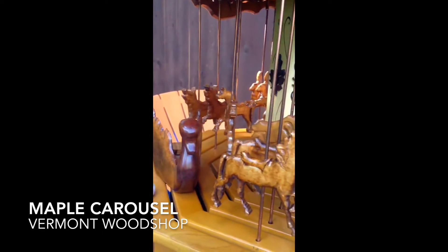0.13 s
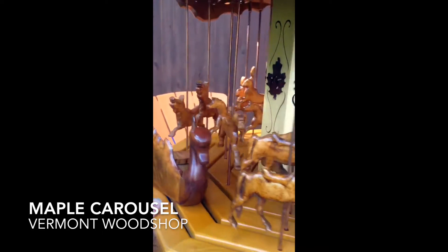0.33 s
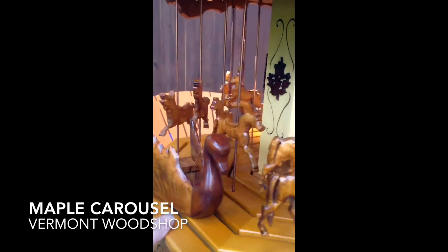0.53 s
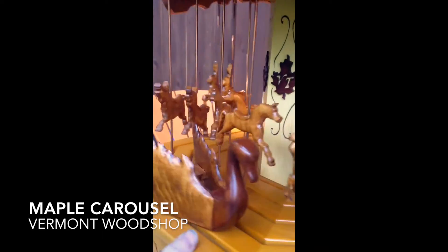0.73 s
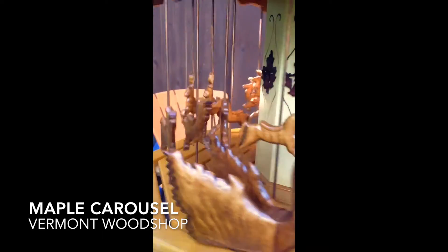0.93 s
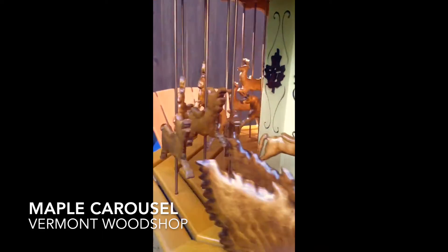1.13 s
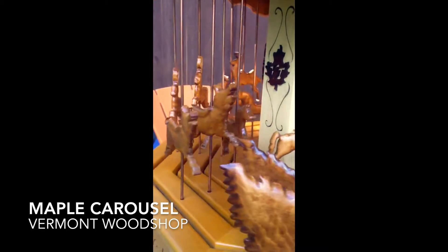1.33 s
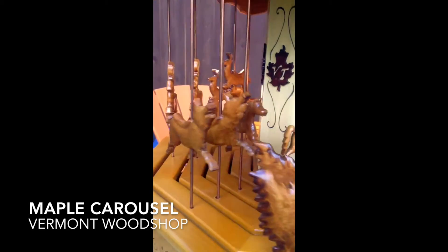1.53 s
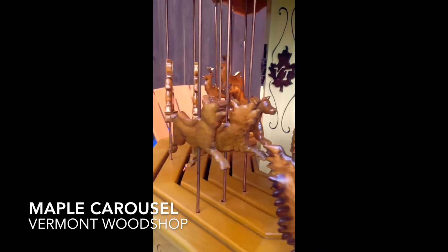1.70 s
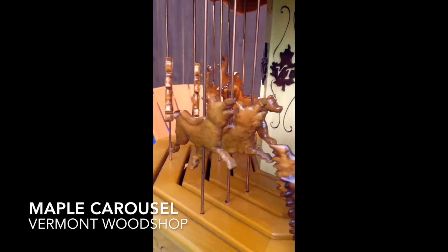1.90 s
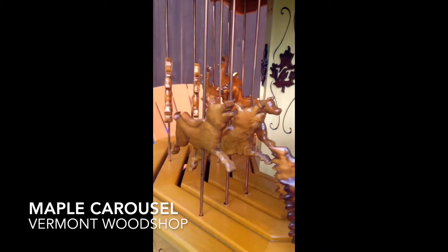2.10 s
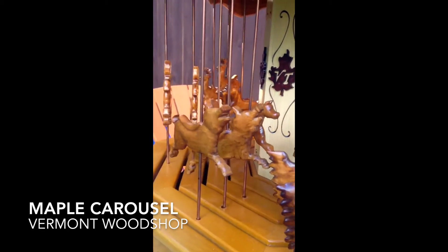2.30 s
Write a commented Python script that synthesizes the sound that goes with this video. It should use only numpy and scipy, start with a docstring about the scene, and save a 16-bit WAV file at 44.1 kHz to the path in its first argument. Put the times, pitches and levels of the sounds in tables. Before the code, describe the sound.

Wood rubbing on wood with hollow rumble and loose knocks as a small carousel is turned twice

```python
"""A wooden model carousel is pushed round twice by hand and coasts to rest, close to a phone in a quiet room.
Wood rubs on wood as noise and struck rings, cut into short slips; the hollow base rumbles as shaken resonances.
Loose figures knock with decaying modes, strong slips scuff as bright noise puffs, a few short high chirps sound
as like puffs, and the bearing squeaks faintly in narrow tones. A short noise tail adds the room's echo over a
steady shaped noise floor."""
import sys
import numpy as np
from scipy import signal
from scipy.io import wavfile
from scipy.ndimage import uniform_filter1d

SR = 44100
rng = np.random.default_rng(int(sys.argv[2]) if len(sys.argv) > 2 else 0)


def attenuation_scalar(level_db):
    """Turn a level in dB into a linear amplitude multiplier (20 dB per decade)."""
    decades = np.asarray(level_db, float) / 20
    return 10 ** decades


def put_to_file(sound):
    """Save the sound as 16-bit audio at rate SR, in the file named by the first command-line argument."""
    columns = np.atleast_2d(sound).T  # one column per channel
    safe = np.clip(columns, -1, 1)
    whole_steps = np.round(safe * 32767)
    wavfile.write(sys.argv[1], SR, whole_steps.astype(np.int16))


N = 103635  # length [samples]


def evened(x):
    """Scales a sound to an RMS of 1."""
    return x / np.sqrt(np.mean(x ** 2) + 1e-20)


def add(mix, s, sound):
    """Lays a sound into the mix at s seconds, cut off at the end."""
    part = mix[round(s * SR):][:len(sound)]
    part += sound[:len(part)]


def resonate(x, hz, width):
    """One resonance of gain 1, fixed or moving: shifts hz down to zero, smooths and shifts back."""
    turn = np.exp(2j * np.pi * np.cumsum(hz * np.ones(len(x))) / SR)
    r = np.exp(-np.pi * width / SR)
    return 2 * (turn * signal.lfilter([1 - r], [1, -r], x / turn)).real


def noise(points, patch_db):
    """Noise of a given spectrum whose level drifts in patches of time and frequency."""
    frames = N // 128 + 5
    hz = np.fft.rfftfreq(512, 1 / SR)
    a, b, patches = rng.standard_normal((frames, 257, 3)).T
    patches = uniform_filter1d(patches, size=5, axis=0)  # over frequency
    patches = evened(uniform_filter1d(patches, size=10, axis=1))  # over time
    f, db = np.transpose(points)
    shape = np.interp(np.log(hz + 1), np.log(f + 1), db, -90, -90)[:, None]
    spectrum = (a + 1j * b) * attenuation_scalar(shape + patch_db * patches)
    return evened(signal.istft(spectrum, nperseg=512, noverlap=384)[1][:N])


def turning_level(column):
    """Gain over time of one layer of the turning carousel, following the two pushes."""
    # Pushes and coasting: (time [s], rumble level [dB], rubbing level [dB], treble hiss level [dB])
    turning = np.array([(.08, -67, -71, -98), (.14, -64, -56, -87), (0.191, -39, -47.5, -53.5),
                        (.26, -36, -41, -52), (.29, -34.5, -39.5, -41), (.34, -35, -34, -35),
                        (.39, -37.5, -35.5, -32.5), (0.481, -44.5, -41.5, -41), (.52, -46, -47.5, -44),
                        (0.582, -52, -53, -60.5), (0.611, -54, -44, -46.5), (.66, -40.5, -43.5, -50),
                        (.72, -37.5, -39.5, -40), (.8, -32.5, -35.5, -42.5), (.85, -33, -33, -38.5),
                        (.9, -34.5, -31.5, -31), (.97, -31, -28, -31.5), (1.03, -31.5, -32, -32),
                        (1.088, -39, -32, -28), (1.12, -38, -35.5, -33), (1.201, -42, -45, -43.5),
                        (1.33, -51.5, -42.5, -41.5), (1.45, -42.5, -48.5, -46.5), (1.56, -41, -44, -52),
                        (1.64, -40, -48, -48.5), (1.78, -49, -53, -49.5), (1.86, -51.5, -57, -64),
                        (1.91, -51, -66, -68), (1.95, -76, -64.5, -83), (2.0, -51, -56.5, -97),
                        (2.05, -79, -57, -60), (2.1, -58, -99, -97)])
    return attenuation_scalar(np.interp(np.arange(N) / SR, turning[:, 0], turning[:, column], -120, -120))


def room_tone():
    """The quiet room's steady noise, strongest in the bass, with slightly drifting patches."""
    # Room spectrum: (frequency [Hz], relative density [dB per Hz])
    spectrum = [(59, -55), (100, 8), (178, 5), (330, 1), (456, 3.5), (577, -3.5), (655, -5), (2210, -8),
                (6730, -20), (15100, -32), (16500, -27)]
    return attenuation_scalar(-60.5) * noise(spectrum, patch_db=1.5)


def room_echo(near):
    """The room's reflections: a noise tail that starts after 4 ms and falls by 60 dB in 0.25 s."""
    t = np.arange(SR // 2) / SR
    tail = rng.standard_normal(len(t)) * attenuation_scalar(-60 * t / 0.25) * (t > .004)
    return attenuation_scalar(-15.5) * signal.fftconvolve(near, tail / np.linalg.norm(tail))[:N]


def squeaks():
    """Narrow tones that swell fast and fade where a part sticks and sings; fuzzy ones are noise in the ring."""
    # Squeaks: (start [s], length [s], frequency [Hz], level [dB], width [Hz], fuzz [0-1])
    songs = [(0.079, 0.24, 2310, -62, 30, 0.46), (.545, 0.12, 394, -33, 25, 0.08),
             (0.4, 0.023, 2500, -34, 99, 0.7), (0.82, 0.024, 4100, -35.5, 200, 1),
             (0.66, 0.32, 2290, -44.5, 120, 0.82), (1.726, 0.048, 16000, -47, 231.5, .9),
             (1.775, .02, 14600, -57, 250, .7), (1.69, 0.2, 5390, -56.5, 65, 1)]
    out = np.zeros(N)
    for s, length, hz, db, width, fuzz in songs:
        t = np.arange(0, length, 1 / SR)
        noisy = evened(resonate(resonate(rng.standard_normal(len(t)), hz, width), hz, 2 * width))
        pure = np.sqrt(2) * np.sin(2 * np.pi * hz * t)
        swell = np.sin(np.pi * (t / length) ** .45)  # an exponent below 1 peaks early
        add(out, s, attenuation_scalar(db) * swell * ((1 - fuzz) * pure + fuzz * noisy))
    return out


def scuffs():
    """Bright puffs with one main ring and a few chance ones: mostly the strongest slips, plus a few short high
    chirps near 1.7 s."""
    # Scuffs: (time [s], nominal peak level [dB], main ring [Hz])
    puffs = [(0.119, -44.5, 4600), (0.167, -43, 4770), (0.208, -35, 4200), (0.2791, -27.5, 5400),
             (0.3267, -26, 4600), (0.4153, -25, 4550), (0.553, -27.5, 13600), (0.6404, -26, 8000),
             (0.6785, -25.5, 4900), (0.84, -25.5, 3940), (1.088, -22, 4940), (1.198, -25.5, 4650),
             (1.256, -24, 5600), (1.456, -20.5, 4400), (1.513, -27.5, 13900), (1.528, -27, 4140),
             (1.5574, -25, 8000), (1.586, -30.5, 8000), (1.657, -26, 5430), (1.6892, -32, 14400),
             (1.726, -28, 8600), (1.8573, -39.5, 6460), (1.9596, -38.5, 3170), (1.988, -35.5, 5500),
             (2.0205, -36, 6800), (2.057, -54, 8930)]
    rise_s, decay_s = 0.00088, 0.0042
    ring_db, stray_db, ring_width_hz = 7, -4, 630
    out, t = np.zeros(N), np.arange(2000) / SR
    high = signal.butter(3, 2520, "high", fs=SR, output="sos")
    envelope = np.minimum(t / rise_s, 1) * np.exp(-t / decay_s)
    for s, db, hz in puffs:
        puff = evened(signal.sosfilt(high, rng.standard_normal(len(t))))
        stray_hz = rng.uniform(4500, 15000, size=4)
        stray = sum(evened(resonate(puff, f, ring_width_hz)) for f in stray_hz)
        main = evened(resonate(puff, hz, ring_width_hz))
        puff = puff + attenuation_scalar(ring_db) * main + attenuation_scalar(stray_db) * stray
        add(out, s, attenuation_scalar(db) * evened(puff) * envelope / 2)  # half leaves room for the noise's peaks
    return out


def knocks():
    """Blow and bounce ring the wood: low modes build slowly, hard contacts reach higher, near modes ring most."""
    # Blows: (time [s], level [dB], contact hardness as top frequency [Hz], mode nearest the blow [Hz])
    blows = [(.292, -30, 1620, 1200), (.521, -28, 2630, 1160), (.788, -27.5, 1930, 1160),
             (.942, -25, 2000, 1170), (1.1365, -24, 2950, 1500), (1.461, -21, 4860, 1650),
             (1.977, -51, 1200, 900), (2.019, -48.5, 5100, 1920)]
    # Modes of the wood: (frequency [Hz], level [dB], decay by 60 dB [s])
    modes = [(572, 5, .05), (870, -6, .04), (1000, -5, .08), (1160, -3, .07), (1540, -2, .045),
             (2000, -7, .035), (2330, -3, .03), (2580, 0, .04), (3900, -9, .03), (4600, -9, .025)]
    near_boost_db, near_octaves, spread_db = 6, .2, 1.5
    rise_cycles, rattle_s, clack_db = 5.5, .006, -7
    bounce_s, bounce_db = .013, -9
    out, t = np.zeros(N), np.arange(4000) / SR
    for s, db, top_hz, near_hz in blows:
        contact = rng.standard_normal(len(t)) * np.exp(-t / rattle_s)
        ring = 0
        chances = rng.standard_normal((len(modes), 3))
        for (hz, mode_db, t60), (spread, turn, back) in zip(modes, chances):
            near_db = near_boost_db * np.exp(-(np.log2(hz / near_hz) / near_octaves) ** 2)
            rise = np.sin(np.pi / 2 * np.minimum(t * hz / rise_cycles, 1)) ** 2
            decay = attenuation_scalar(-60 * np.maximum(t - rise_cycles / hz, 0) / t60)
            gain = attenuation_scalar(mode_db + near_db + spread_db * spread)
            mode = gain * rise * decay * np.sin(2 * np.pi * (hz * t + turn))
            bounce = back * np.roll(mode, round(bounce_s * SR))  # chance strength and sign
            ring = ring + mode + attenuation_scalar(bounce_db) * bounce
        clack = resonate(resonate(contact, top_hz / 2, top_hz / 2), top_hz / 2, top_hz / 2)
        hit = evened(ring) + attenuation_scalar(clack_db) * evened(clack)
        hit = signal.lfilter(*signal.butter(2, top_hz, fs=SR), hit)
        add(out, s, attenuation_scalar(db) * hit / np.sqrt(2 * np.mean(hit[:400] ** 2)))  # levelled by its first 9 ms
    return out


def rumble():
    """The bearing shakes the hollow base in its low modes, which waver as the load shifts."""
    # Modes of the base: (frequency [Hz], width [Hz], level [dB])
    modes = [(215, 50, -20), (270, 45, -3), (310, 55, -4), (362, 50, -3), (397, 38, -1), (480, 60, -14),
             (585, 55, -7)]
    # The load leans between lower and upper modes: (time [s], boost of the upper over the lower [dB])
    lean = [(.19, 0), (.25, -6), (.5, 3), (.67, -1), (.95, 3.5), (1.18, 3), (1.5, 1), (1.86, -8.5)]
    lean_hz, waver = 340, .025  # divide between the modes; RMS pitch drift as a share
    shake = rng.standard_normal(N)
    lean_db = np.interp(np.arange(N) / SR, *np.transpose(lean))
    wander = uniform_filter1d(uniform_filter1d(rng.standard_normal(N), size=3000), size=3000)
    drift = 1 + waver * evened(wander)
    rings = 0
    for k, (hz, width, db) in enumerate(modes):
        ring = evened(resonate(resonate(shake, hz * drift, 2 * width), hz * drift, width))
        gain = attenuation_scalar(db + lean_db * np.sign(hz - lean_hz) / 2)
        rings = rings + gain * ring * (-1) ** k  # neighbours in opposite polarity
    return turning_level(column=1) * evened(rings)


def rubbing():
    """Stick and slip: slips start sharply and die; hiss follows fully, rub in part; grit ticks the wood's rings."""
    # Woody rub spectrum: (frequency [Hz], relative density [dB per Hz])
    rub_spectrum = [(290, -68), (500, -28), (590, -29.5), (689, -10.5), (991, -8), (1250, -9.5),
                    (2740, -11), (7000, -24.5), (9100, -18.5), (15400, -120)]
    # Treble hiss spectrum: (frequency [Hz], relative density [dB per Hz])
    hiss_spectrum = [(2940, 0), (5000, 0), (5550, 1.5), (6370, -5), (11800, -5.5), (15500, -7)]
    # Rings of the rubbed wood: (frequency [Hz], width [Hz], level [dB])
    wood_rings = [(1010, 40, -2), (1155, 50, -1), (1570, 60, -1), (1740, 50, -1), (2290, 50, 6),
                  (2780, 90, 2), (3880, 70, 1), (4600, 90, 0)]
    slips_per_s, slip_spread_db, slip_decay_s = 100, 5, 0.0036
    steady, rub_share = 1.87, 0.59  # rubbing between slips; exponent of the slips on the rub
    grit_per_s, grit_spread_db, rings_db = 250, 5., -2
    patch_db = 2.5

    kick_db = slip_spread_db * np.minimum(rng.exponential(1, N), 2.5)
    kicks = (rng.random(N) < slips_per_s / SR) * attenuation_scalar(kick_db)
    slips = signal.lfilter([1], [1, -np.exp(-1 / (slip_decay_s * SR))], kicks)
    slips = evened(steady + slips)

    size = (len(wood_rings), N)
    grit = (rng.random(size) < grit_per_s / SR) * attenuation_scalar(grit_spread_db * rng.standard_normal(size))
    rings = sum(attenuation_scalar(db) * evened(resonate(ticks, hz, width))
                for ticks, (hz, width, db) in zip(grit, wood_rings))
    rub = evened(noise(rub_spectrum, patch_db) + attenuation_scalar(rings_db) * evened(rings))
    woody = turning_level(column=2) * rub * evened(slips ** rub_share)
    hiss = turning_level(column=3) * noise(hiss_spectrum, patch_db) * slips
    return woody + hiss


def scene():
    """The turning carousel with its echo over the room tone, as one channel."""
    near = squeaks() + scuffs() + knocks() + rumble() + rubbing()
    return (near + room_echo(near) + room_tone())[None]


def low_pass(x):
    """Removes everything above the highest recorded frequency."""
    return signal.sosfilt(signal.butter(12, 16850, fs=SR, output="sos"), x)


def record(dry):
    """The phone microphone cuts the bass and the extreme top."""
    bass_cut = signal.butter(4, 167, "high", fs=SR, output="sos")
    top_cut = signal.firwin(151, 15800, window=("kaiser", 4), fs=SR)
    thin = signal.sosfilt(bass_cut, dry)
    mix = signal.oaconvolve(thin, top_cut[None], "same")
    return low_pass(mix)


dry = scene()
out = record(dry)
put_to_file(out)
```